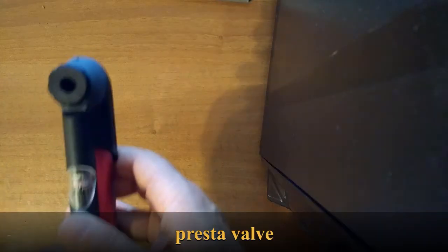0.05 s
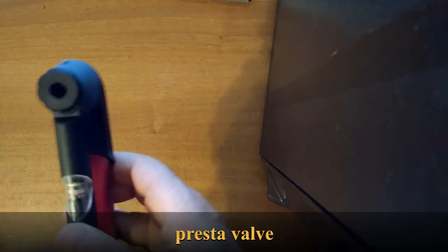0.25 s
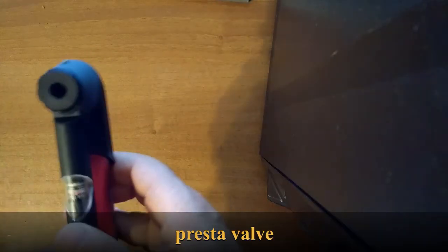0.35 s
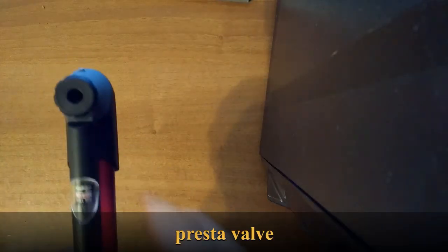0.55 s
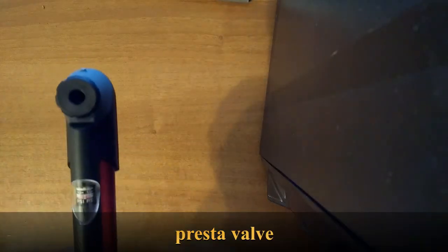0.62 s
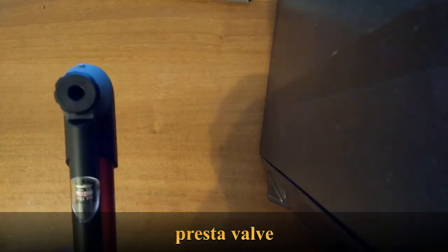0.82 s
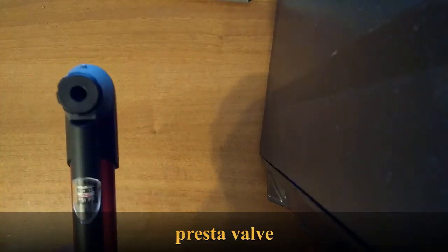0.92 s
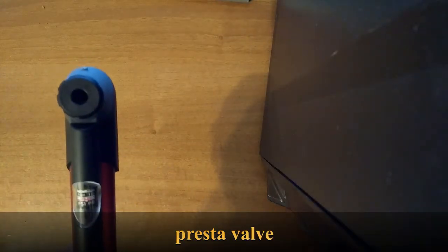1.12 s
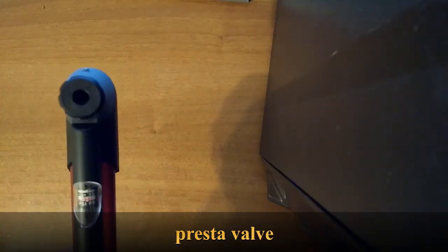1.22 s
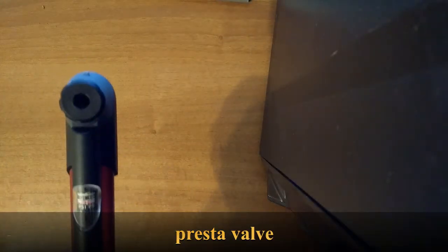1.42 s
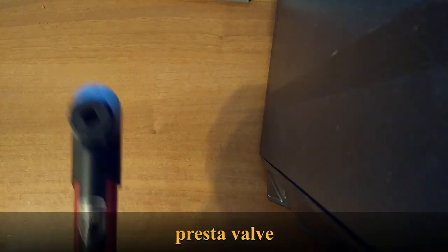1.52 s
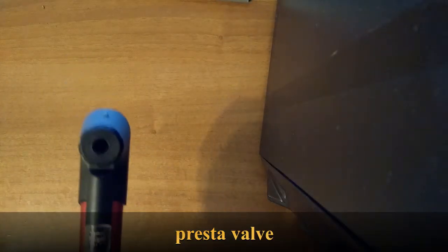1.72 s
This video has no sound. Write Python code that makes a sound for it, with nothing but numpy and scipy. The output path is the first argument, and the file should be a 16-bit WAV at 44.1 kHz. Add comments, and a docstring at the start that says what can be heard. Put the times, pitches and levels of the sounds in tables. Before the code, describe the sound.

One sharp plastic click with a tiny rattle sounds near the microphone as a hand pump's lever closes, followed by a light finger scuff. Behind it, in a small room, a machine throbs quietly on the right with a faint whine.

```python
"""A sharp plastic snap close on the left: the lever of a small hand pump shuts, rebounds and
scrapes into its seat. Each blow rings the lever's high modes over a knock on the barrel;
fingers brush and scuff the plastic. A small room answers. Behind it, mostly on the right,
a machine turns with a low throb and a faint whine, over a soft hiss."""
import sys
import numpy as np
from scipy import signal
from scipy.fft import rfft, irfft
from scipy.io import wavfile
from scipy.ndimage import uniform_filter1d

SR = 44100
rng = np.random.default_rng(int(sys.argv[2]) if len(sys.argv) > 2 else 0)


def transcribe(signal):
    """Save signal, clipped to [-1, 1], as a 16-bit WAV file at the path in sys.argv[1]."""
    frames = np.atleast_2d(signal).T
    limited = np.clip(frames, -1, 1)
    pcm = np.round(limited * 32767).astype(np.int16)
    wavfile.write(sys.argv[1], SR, pcm)


N = 77175


def amp(db):
    """Decibels to gain."""
    return 10 ** (np.asarray(db) / 20)


def unit_rms(x):
    """Scale to rms 1."""
    return x / np.sqrt(np.mean(x ** 2) + 1e-20)


def lookup(curve, hz, column=1):
    """Interpolate a table column over log frequency."""
    table = np.array(curve, float)
    return np.interp(np.log(hz + 1), np.log(table[:, 0] + 1), table[:, column])


def add(mix, at_s, sound):
    """Mix a sound in at a time."""
    part = mix[max(round(at_s * SR), 0):][:len(sound)]
    part += sound[:len(part)]


def colour(x, curve, column=1, size=4096):
    """Minimum-phase filter from a gain curve in dB."""
    log_gain = np.log(amp(lookup(curve, abs(np.fft.fftfreq(size, 1 / SR)), column)))
    taps = np.fft.ifft(np.exp(np.conj(signal.hilbert(log_gain)))).real
    return signal.fftconvolve(x, taps[:size // 2])[:len(x)]


def cut(x, hz, kind, order=2):
    """Butterworth high-pass or low-pass."""
    return signal.sosfilt(signal.butter(order, hz, kind, fs=SR, output="sos"), x)


def shaped(white, curve, column=1):
    """Give white noise a density in dB/Hz."""
    gain = amp(lookup(curve, np.fft.rfftfreq(N, 1 / SR), column))
    return irfft(rfft(white) * gain, N) * np.sqrt(SR / 2)


def tone(hz, waver_hz=1.25):
    """Sine of rms 1 with slowly drifting pitch."""
    drift = unit_rms(np.interp(np.arange(N), np.linspace(0, N, 20), rng.standard_normal(20)))
    return np.sqrt(2) * np.sin(2 * np.pi * np.cumsum(hz + waver_hz * drift) / SR)


def burst(decay_s, rise_s=0.00018):
    """A quick run of tiny contacts, dying away."""
    t = np.arange(SR // 20) / SR
    return rng.choice([-1., 1.], len(t)) * (1 - np.exp(-t / rise_s)) * np.exp(-t / decay_s)


def modes(table):
    """Decaying sines struck together."""
    t = np.arange(SR // 20) / SR
    return sum(amp(db - 60 * t / t60_s) * np.sin(2 * np.pi * hz * t) for hz, db, t60_s in table)


def hiss():
    """Gently wavering room noise, alike on both sides only in the bass."""
    # noise spectrum (frequency [Hz], left [dB/Hz], right [dB/Hz])
    density = [(24.2, -106, -106), (37.8, -99, -99), (51.2, -80.5, -102.5), (98.5, -83, -85.5),
               (162.7, -91, -70.5), (243.4, -86, -77.5), (328, -90, -87), (578, -91.5, -90),
               (917, -101, -89.5), (1600, -106, -100), (2370, -111, -110), (5500, -111, -117),
               (9600, -108, -117), (12300, -113, -115), (16200, -114, -115)]
    # likeness of the sides (frequency [Hz], correlation [0-1])
    likeness = [(50, 0.65), (120, 0.23), (260, 0.68), (600, 0.05), (2000, 0.14)]
    waver_db, waver_s = 1.14, 0.019
    left, independent = rng.standard_normal((2, N))
    shared = lookup(likeness, np.fft.rfftfreq(N, 1 / SR))
    right = irfft(shared * rfft(left) + np.sqrt(1 - shared ** 2) * rfft(independent), N)
    waver = unit_rms(uniform_filter1d(rng.standard_normal(N), round(waver_s * SR)))
    return np.array([shaped(left, density), shaped(right, density, column=2)]) * amp(waver_db * waver)


def machine():
    """Hum and rumble swell once a turn, mostly on the right; a thin whine and a low drone grow."""
    # hum (harmonic of the turning rate [-], right level [dB])
    harmonics = [(7, -61), (8, -53), (9, -53), (11, -62), (12, -59.5), (13, -64)]
    # rumble spectrum (frequency [Hz], right density [dB/Hz])
    rumble_density = [(60, -100), (85, -81), (115, -77), (175, -75), (215, -96), (255, -76.5), (330, -101),
                      (900, -100), (2000, -125)]
    # steady tones (frequency [Hz], left [dB], right [dB])
    partials = [(726.4, -83.5, -73.5), (791.5, -86, -72.5), (854, -90, -76), (1005, -88, -80.5)]
    turn_hz, throb_peak_s, throb_depth = 13.93, 0.8135, 0.42
    whine_hz, whine_rise_s, whine_db = 669, (0.915, 0.965), (-64.5, -60.5)
    drone_hz, drone_db = 68.2, (-76, -60)
    t = np.arange(N) / SR
    turn_rad = 2 * np.pi * turn_hz * (t - throb_peak_s)
    hum = np.sqrt(2) * sum(amp(db) * np.cos(k * turn_rad) for k, db in harmonics)
    throb = unit_rms(1 + throb_depth * np.cos(turn_rad))
    rumble = shaped(rng.standard_normal(N), rumble_density) * throb
    whine = amp(np.interp(t, whine_rise_s, whine_db)) * tone(whine_hz)
    tones = sum(amp([[left_db], [right_db]]) * tone(hz) for hz, left_db, right_db in partials)
    drone = amp(np.linspace(*drone_db, N)) * tone(drone_hz)
    return (amp([[-56], [0]]) * (hum + rumble)  # [left], [right] in dB
            + amp([[-42.5], [0]]) * whine
            + amp([[0], [-5]]) * drone
            + tones)


def room(source, reverb_send):
    """Direct sound on the left, shaded on the right; early reflections, then a diffuse tail."""
    # shading of the right side (frequency [Hz], gain [dB])
    shade = [(300, -21), (1400, -9.5), (3500, -8.5), (7000, -46), (10000, -50), (16000, -41)]
    # desk and wall reflections (delay [s], left [dB], right [dB])
    echoes = [(.0014, -37, -28), (.0082, -21.5, -39)]
    # reverberation colour (frequency [Hz], left [dB], right [dB])
    tail_colour = [(298, 2, 1), (1490, -11.5, -3.5), (3660, 3, -7), (5200, -3, -9), (6600, -7, -16.5),
                   (9000, -12, -26), (10300, -9.5, -31), (12300, -16.5, -27), (14300, -16, -19)]
    # reverberation decay (frequency [Hz], t60 [s])
    tail_t60 = [(500, 0.63), (4000, 0.16), (9000, 0.37), (15000, 0.56)]
    shade_delay_s, tail_delay_s, tail_build_s = 0.00045, 0.006, 0.0014
    out, t = np.zeros((2, N)), np.arange(SR) / SR
    add(out[0], 0, source)
    add(out[1], shade_delay_s, colour(source, shade))
    for side in range(2):
        for delay_s, *db in echoes:
            smear = cut(burst(decay_s=0.0012), 9000, "lowpass", order=3)
            echo = signal.fftconvolve(source, smear / np.linalg.norm(smear))
            add(out[side], delay_s, amp(db[side]) * echo)
        hz, age_s, noise = signal.stft(rng.standard_normal(SR), SR, nperseg=256)
        decay = amp(-60 * age_s / lookup(tail_t60, hz)[:, None])
        tail = signal.istft(noise * decay, SR)[1][:SR]
        tail *= 1 - np.exp(-t / tail_build_s)
        send = colour(reverb_send, tail_colour, column=side + 1)
        add(out[side], tail_delay_s, signal.fftconvolve(send, tail / np.linalg.norm(tail)))
    return out


def rub(strokes, curve):
    """Skin on plastic: one noise swell per stroke."""
    out = np.zeros(N)
    for at_s, length_s, db in strokes:
        swell = np.hanning(round(length_s * SR))
        add(out, at_s, amp(db) * swell * rng.standard_normal(N)[:len(swell)])
    return colour(out, curve)


def fingers():
    """Fingers brush the barrel faintly and scuff as they let go."""
    # brush strokes (time [s], length [s], level [dB])
    brushes = [(0.0, 0.046, -75), (0.086, 0.035, -76), (0.128, 0.073, -78), (0.37, 0.066, -68.5),
               (0.51, 0.11, -76.5), (0.72, 0.055, -77)]
    # brush colour (frequency [Hz], gain [dB])
    brush_colour = [(2000, 3.5), (5500, 8), (9300, 19.5), (12000, 7), (16000, -22)]
    # scuffs (time [s], length [s], level [dB])
    scuffs = [(0.4012, .006, -33.5), (0.409, .013, -51)]
    # scuff colour (frequency [Hz], gain [dB])
    scuff_colour = [(2000, -25), (4400, -8.5), (5100, -13), (6000, -1.5), (6900, -6), (7800, -27)]
    return rub(brushes, brush_colour) + rub(scuffs, scuff_colour)


def seating():
    """The lever comes to rest with soft clacks over a hollow thud of the barrel."""
    # contacts with the seat (time [s], level [dB], low-pass [Hz])
    contacts = [(0.3094, -22, 10000), (0.3113, -22, 13500), (0.3168, -29, 13100)]
    # seat colour (frequency [Hz], gain [dB])
    seat_colour = [(300, -7), (1500, -13.5), (2300, -0.5), (2900, -10.5), (3700, 0.5), (5200, -4),
                   (6200, -1.5), (8500, 6), (10300, -5), (11300, 6.5), (15000, -12)]
    # barrel thud colour (frequency [Hz], gain [dB])
    thud_colour = [(300, -13), (1000, 0), (2200, -3.5), (3000, -16)]
    thud_at_s, thud_db = 0.3095, -35
    clacks, thud = np.zeros((2, N))
    add(thud, thud_at_s, amp(thud_db) * burst(decay_s=0.004))
    for at_s, db, cutoff_hz in contacts:
        add(clacks, at_s, amp(db) * cut(burst(decay_s=0.0011), cutoff_hz, "lowpass", order=5))
    return colour(clacks, seat_colour) + cut(colour(thud, thud_colour), 3000, "lowpass")


def scrapes():
    """Plastic on plastic: the lever slides with fine grains and catches in brief bursts."""
    # catches (time [s], level [dB], decay [s])
    catches = [(0.2811, -22, 0.0014), (0.2849, -21.5, 0.00076), (0.3036, -20.5, 0.00079)]
    # scrape colour (frequency [Hz], gain [dB])
    scrape_colour = [(300, -16.5), (1500, -22), (2400, -9.5), (3700, -6), (5000, -8), (6600, 2), (8700, 9),
                     (10300, 6), (11400, 2), (13200, -3), (14700, 1), (16000, -13.5)]
    slide_start_s, slide_end_s, slide_db, grains_per_s = 0.246, 0.298, -39, 1300
    out = np.zeros(N)
    for at_s, db, decay_s in catches:
        add(out, at_s, amp(db) * burst(decay_s))
    grains = unit_rms(rng.choice([-1., 1.], N) * (rng.random(N) < grains_per_s / SR))
    stroke = np.sqrt(np.hanning(round((slide_end_s - slide_start_s) * SR)))
    add(out, slide_start_s, amp(slide_db) * stroke * grains[:len(stroke)])
    return colour(out, scrape_colour)


def snaps():
    """Each blow rings the lever's short, high modes over a dry knock on the barrel."""
    # first blow and rebounds (time [s], level [dB])
    blows = [(0.242, 0), (0.2593, -9.5), (0.2646, -22), (0.2691, -23.5), (0.273, -22), (0.2767, -19),
             (0.2836, -18)]
    # bright lever modes (frequency [Hz], level [dB], t60 [s])
    lever_modes = [(6460, -34, 0.027), (6940, -24, 0.0098), (7320, -10, 0.0063), (8140, -16.5, 0.011),
                   (8860, -10.5, 0.0094), (9300, -17.5, 0.0106), (11300, -16.5, 0.006),
                   (11770, -11.5, 0.006)]
    # weak barrel modes (frequency [Hz], level [dB], t60 [s])
    barrel_modes = [(496, -45.5, 0.0079), (905, -41, 0.0054), (1560, -35, 0.0091), (2060, -42.5, 0.013),
                    (3250, -44, 0.016), (3650, -43, 0.0172), (4520, -40, 0.013), (14300, -33, 0.0068)]
    # knock colour (frequency [Hz], gain [dB])
    knock_colour = [(150, -11), (900, 2), (2700, -6.5), (5500, -3.5), (15000, -5.5)]
    ring_low_hz, ring_high_hz, knock_db = 6350, 12350, -12
    ring = cut(modes(lever_modes), ring_low_hz, "highpass", order=14)
    ring = cut(ring, ring_high_hz, "lowpass", order=10)
    barrel = modes(barrel_modes)
    out = np.zeros(N)
    for at_s, db in blows:
        crack = burst(decay_s=0.0018)
        knock = amp(knock_db) * colour(crack / np.linalg.norm(crack), knock_colour)
        add(out, at_s, amp(db) * (ring + barrel + knock))
    return out


def scene():
    """The pump in its room, over machine and hiss; snaps feed the tail less than the rattle does."""
    snap_send_db = -6.5
    snap = snaps()
    rattle = scrapes() + seating() + fingers()
    return room(snap + rattle, amp(snap_send_db) * snap + rattle) + machine() + hiss()


def record(dry):
    """Linear-phase band limit."""
    edge_hz = 16000
    taps = signal.firwin(255, edge_hz, window=("kaiser", 9), fs=SR)
    return signal.oaconvolve(dry, taps[None], "same", axes=1)


dry = scene()
out = record(dry)
transcribe(out)
```